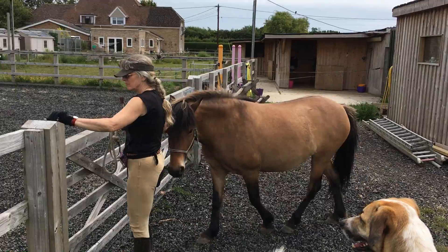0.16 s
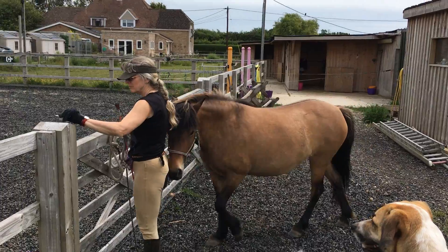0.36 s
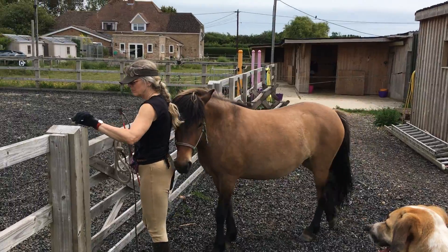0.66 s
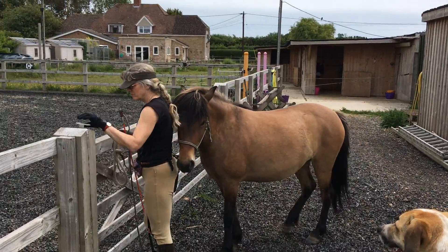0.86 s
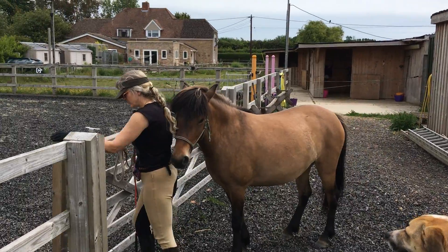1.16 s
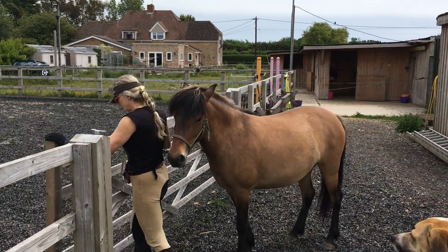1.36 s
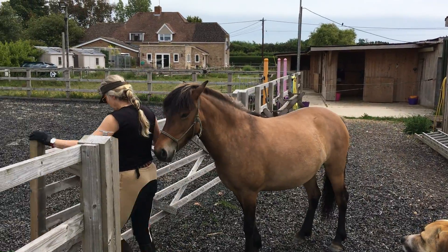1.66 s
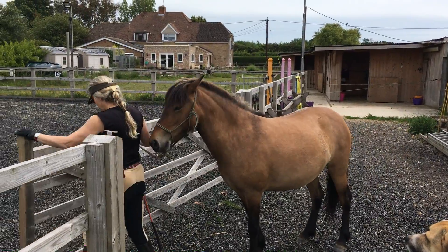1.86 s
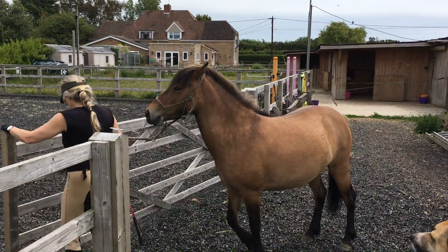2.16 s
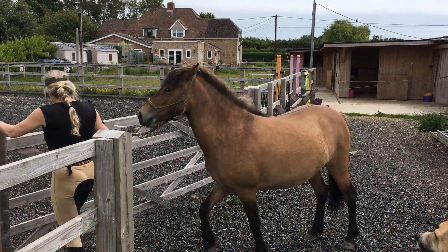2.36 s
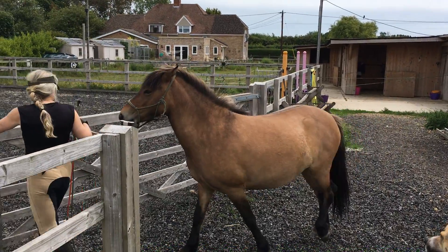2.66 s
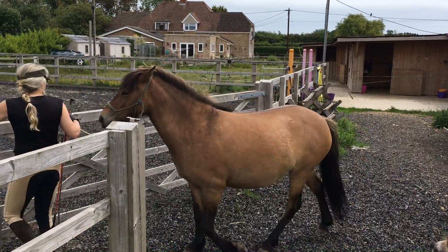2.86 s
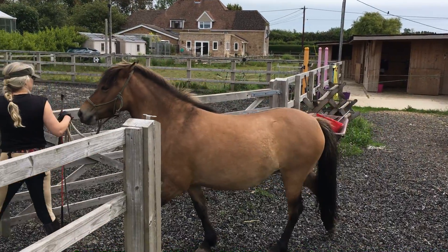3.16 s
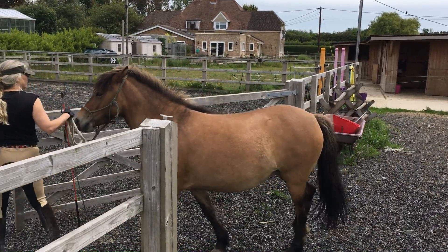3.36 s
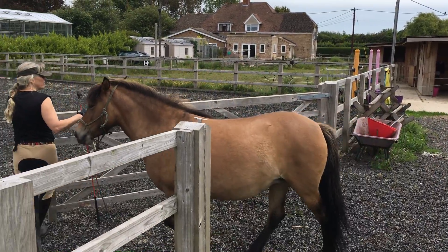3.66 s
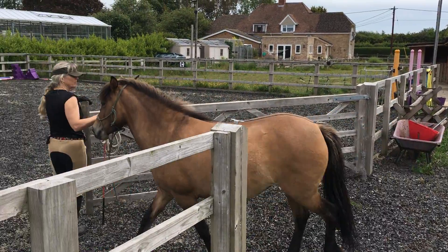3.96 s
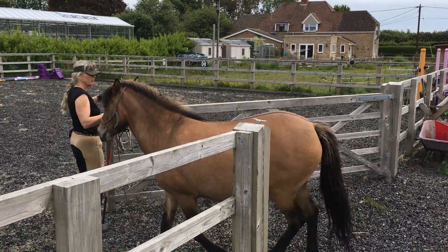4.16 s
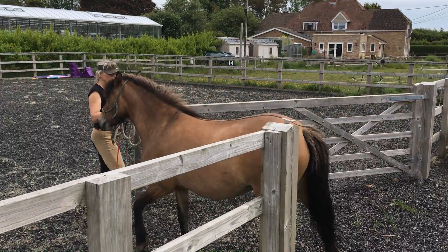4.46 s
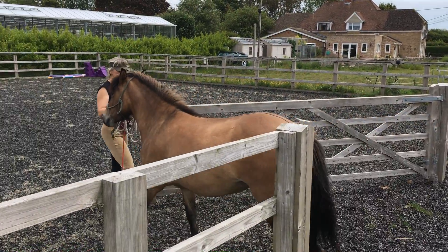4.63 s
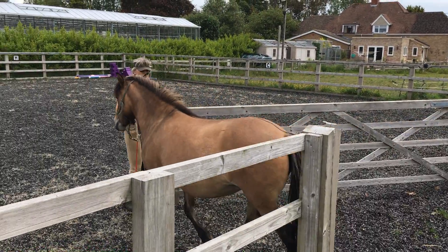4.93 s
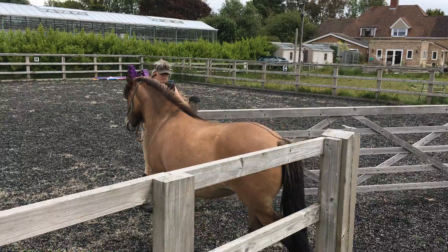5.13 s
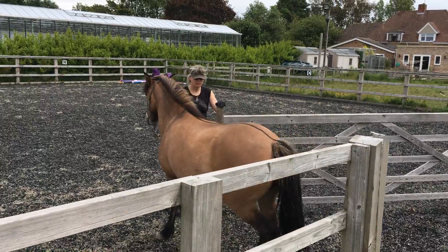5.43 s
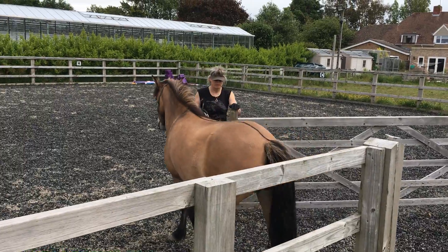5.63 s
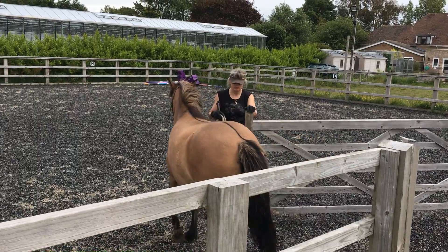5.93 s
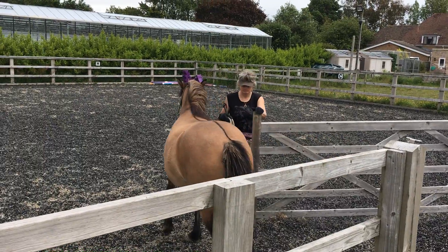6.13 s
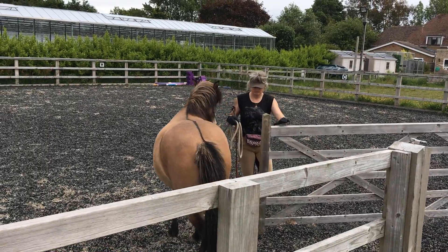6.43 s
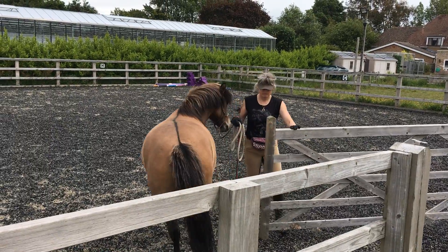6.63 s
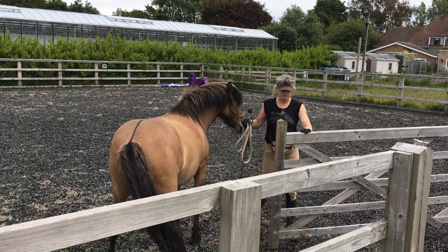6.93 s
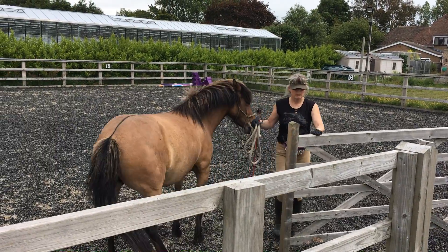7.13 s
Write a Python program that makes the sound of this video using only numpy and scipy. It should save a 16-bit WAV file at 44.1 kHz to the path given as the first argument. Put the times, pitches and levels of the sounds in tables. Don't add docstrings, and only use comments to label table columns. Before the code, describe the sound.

Outdoors, two sharp latch knocks ring out, slow hoof steps crunch stone chippings, and a distant horse's shrill whinny drops into a throaty snort.

```python
import sys
import numpy as np
from scipy import signal
from scipy.fft import rfft, irfft
from scipy.io import wavfile

SR = 44100
rng = np.random.default_rng(int(sys.argv[2]) if len(sys.argv) > 2 else 0)


def invert_db(level):
    return 10 ** (np.asarray(level, dtype=float) / 20)


def dump(signal):
    limited = np.clip(np.atleast_2d(signal).T, -1, 1)
    pcm = np.round(limited * 32767).astype(np.int16)
    wavfile.write(sys.argv[1], SR, pcm)


N = 321489

# (frequency [Hz], density [dB per Hz])
AIR_COLOUR = [(20, -44), (50, 5.5), (300, -13), (480, -30.5), (700, -20), (2200, -30.5), (13500, -37),
              (16000, -38)]
AIR_DB = -58
TRAFFIC_HZ, TRAFFIC_WIDTH_HZ, TRAFFIC_DB, TRAFFIC_SWELL_DB = 69.8, 11.5, -56.5, 1.2
CAPSULE_HZ, CAPSULE_WIDTH_HZ, CAPSULE_DB = 13800, 3000, -73.5

# (middle [s], half length [s], bright crunch [dB], dull crunch [dB])
STRIDES = [(0.0, 0.22, -67.5, -74.5), (0.317, 0.043, -54, -66), (0.422, 0.25, -83, -63),
           (0.585, 0.029, -73, -74), (0.622, 0.028, -63, -54), (0.75, 0.085, -62, -68.5),
           (1.095, 0.71, -73, -67.5), (1.503, 0.078, -65, -61.5), (1.77, 0.39, -64.5, -65.5),
           (2.212, 0.37, -68, -67.5), (2.634, 0.1, -67, -69), (2.767, 0.13, -63, -62),
           (2.898, 0.11, -64.5, -65), (3.07, 0.14, -64.5, -66), (3.242, 0.16, -67.5, -67),
           (3.58, 1, -69.5, -68.5), (3.819, 0.069, -69, -63), (4.037, 0.23, -66, -59.5),
           (5.483, 0.16, -72, -64), (6.273, 0.035, -67.5, -86), (6.453, 0.027, -64, -68.5),
           (6.666, 0.1, -70, -78), (6.988, 0.1, -65.5, -67.5), (7.28, 0.22, -59.5, -62.5)]
# (time [s], peak [dB], body [dB])
FLAKES = [(0.196, -51.5, -4), (0.7402, -38, -39), (0.7677, -43, -30), (1.3553, -50, -0.5),
          (1.4341, -33, -47), (2.5805, -43.5, -26), (3.04, -42, -8), (3.0624, -44, -35.5),
          (3.1882, -43, -28), (3.2894, -42.5, -19), (3.3024, -41, -14.5), (3.3278, -49.5, -5.5),
          (3.477, -46, -35), (3.6406, -47.5, -23), (3.7793, -50, -9), (3.8492, -40.5, -19),
          (7.1694, -47.5, -19)]
# (time [s], peak [dB], body [dB])
STONES = [(0.7814, -42, -27), (1.2885, -39.5, -49), (1.4745, -38.5, -18), (1.483, -44, -18),
          (1.4994, -46, -5.5), (1.5254, -42, -14), (2.745, -50, -8.5), (2.906, -49, -20),
          (3.8187, -44, -2.5), (3.93, -44.5, -9), (3.9589, -36.5, -17), (4.0312, -39.5, -20),
          (4.0534, -39, -23), (5.7654, -59, 4.5), (5.855, -51.5, -6.5), (5.9644, -51.5, -3),
          (6.094, -58, -4), (6.5924, -40.5, -12), (6.6618, -42, -9)]
# (time [s], peak [dB], pitch [Hz])
CHIPS = [(.736, -46, 9100), (.7415, -48, 6470), (.757, -42, 12000), (.765, -42.5, 4300), (.768, -42, 6500),
         (.77, -42, 14500), (0.7792, -43, 6440), (0.779, -45, 11500), (.811, -52, 12000), (.87, -52, 13000),
         (1.354, -58, 900), (1.151, -55, 6000), (1.166, -52, 12500), (1.2327, -57.5, 8800),
         (1.336, -62, 4860), (1.37, -55, 6300), (1.379, -53, 6300), (1.426, -49, 11000),
         (1.4258, -48.5, 3480), (1.5601, -50, 13000), (1.6364, -52, 12100), (1.665, -52, 5000),
         (1.7591, -64, 6100), (1.7675, -51, 5970), (1.927, -60, 6000), (2.01, -54, 14000),
         (2.3947, -54.5, 9700), (2.438, -58.5, 6160), (2.6115, -57, 13000), (2.6601, -54, 12350),
         (2.735, -49.5, 2120), (2.778, -54, 3000), (2.906, -51, 7000), (2.945, -56, 3490),
         (3.041, -52, 13400), (3.0605, -58, 8760), (3.061, -36.5, 11000), (3.151, -53, 4000),
         (3.288, -47, 14000), (3.304, -42, 14500), (3.33, -52, 12500), (3.425, -56.5, 13000),
         (3.439, -53.5, 4570), (3.478, -49, 11600), (3.3754, -54, 14100), (3.6095, -51, 9180),
         (3.694, -52.5, 3280), (3.9935, -51, 6060), (5.125, -41, 720), (5.768, -56, 1030),
         (5.857, -56.5, 1590), (6.094, -58, 2190), (6.6616, -51, 2410), (6.4284, -69.5, 5970)]
GRAINS_PER_S = 1000
GATE_STILL_S = 0.72
FLAKE_HZ, STONE_HZ = 13000, 3100
SNAP_RISE_S, SNAP_T60_S = 0.002, 0.045
CRACK_T60_S, CRACK_DB = 0.012, 3
CHIP_T60_S, CHIP_LEAD_S, CHIP_SPREAD = 0.012, 0.004, 1.35
CHIP_BITE_DB, CHIP_MIDDLE_HZ = 14, 10000

# (time [s], peak [dB], half length [s], lower modes [dB])
SQUEALS = [(0.35, -13, 0.011, -11), (0.361, -19, 0.0061, 1.5), (0.37, -13.5, 0.011, -14.5),
           (0.384, -25, 0.013, -10), (0.406, -39, .015, -13), (.424, -40, 0.0055, -19),
           (.448, -33, .008, -20.5), (0.465, -36.5, 0.015, -17), (0.482, -45, 0.017, -4),
           (0.528, -62, .02, 5), (0.554, -65, 0.061, 3)]
# (frequency [Hz], level [dB], width [Hz])
PIN = [(13290, 0, 48), (6800, -5, 91), (7770, -22, 180), (11300, -15, 150), (5900, -15.5, 200),
       (14100, -22.5, 370)]
# (time [s], peak [dB], timber [dB], t60 [s])
KNOCKS = [(0.2424, -22.5, -31, 0.058), (0.3503, -44, -40, 0.16), (0.366, -13, -39.5, 0.047),
          (0.387, -20, -28, 0.078), (0.3926, -2, -24.5, 0.025), (0.3967, -21, -27, 0.06),
          (0.4137, -33, -50, 0.2), (0.428, -33, -48, 0.069), (0.4536, -31, -49, 0.063),
          (0.495, -35, -52, 0.13), (0.5273, -46, -49.5, 0.08), (0.57, -70, -55.5, 0.42),
          (0.632, -46, -41, 0.06), (0.652, -43, -46, 0.02), (0.846, -84, -49.5, 0.086),
          (0.879, -40, -43, 0.091), (0.937, -64, -50, 0.12), (0.945, -15, -24, 0.079),
          (0.9544, -34.5, -59, 0.27), (0.964, -20, -30.5, 0.095), (0.9767, -23, -25, 0.045),
          (0.9806, -34, -40, 0.052), (0.997, -50, -53, 0.17), (1.047, -40, -60, 0.13),
          (1.073, -44.5, -59, 0.24)]
# (frequency [Hz], width [Hz], level [dB])
TIMBER = [(717, 95, -6), (1029, 270, -3.5), (1230, 244, -1.5), (1480, 290, -4.5), (2260, 390, -9),
          (3000, 1000, -13.5)]
# (frequency [Hz], level [dB])
BOLT = [(4100, -4.5), (5717, 3.5), (6702, -1.5), (8527, -3.5), (9388, -4), (10420, -7), (11230, 0),
        (11890, 1), (12690, -1), (13260, -2), (14100, -5), (15330, -6)]
# (middle [s], peak [dB], half length [s])
BOOMS = [
    (.2465, -40, 0.0082),
    (0.371, -36, .003),
    (0.3965, -16, 0.0061),
    (.406, -29, 0.0046),
    (.58, -54, .015),
    (0.653, -49, .006),
    (0.956, -39, 0.0029),
    (0.9783, -27.5, 0.0043),
]
# (frequency [Hz], level [dB])
POST = [(1017, -5), (1168, -3.5), (1599, -14.5)]
BOLT_FREE_S = 0.872
BOLT_WIDTH_HZ, BOLT_DB, SLIDE_DB = 125, 0, -55
BLOW_DB, BLOW_S = -2, 0.0004

# (start [s], length [s], from [Hz], to [Hz], level [dB])
BIRDS = [(2.19, .014, 4100, 3800, -67), (2.716, 0.035, 3420, 3340, -71), (5.547, .04, 6300, 4230, -72),
         (5.843, 0.14, 5900, 5880, -74), (2.404, 0.042, 1430, 1480, -66.5),
         (2.438, .026, 2560, 2170, -66.5), (2.457, 0.028, 2140, 1840, -62.5),
         (3.468, 0.051, 2745, 3080, -68.5), (3.502, 0.052, 3050, 3130, -72), (3.54, .04, 3120, 3060, -71),
         (3.545, 0.046, 3000, 2750, -72), (3.62, .024, 3080, 3100, -71), (5.519, 0.077, 3680, 4160, -60),
         (5.682, 0.052, 8300, 8100, -72), (5.738, 0.051, 8100, 7500, -79.5),
         (5.782, 0.061, 4450, 4350, -65.5), (6.012, 0.075, 5900, 4910, -76),
         (6.326, 0.085, 4470, 4460, -67), (6.422, 0.13, 4380, 4530, -74), (6.495, 0.016, 7350, 6300, -80),
         (6.496, 0.025, 6260, 6400, -68), (6.514, 0.079, 7040, 7310, -74), (6.588, 0.036, 6550, 6300, -72),
         (6.659, .07, 5600, 5650, -76), (6.741, 0.064, 5540, 5600, -71), (6.762, 0.024, 4940, 3420, -74.5),
         (6.779, 0.09, 3400, 3660, -71), (7.01, .045, 3700, 3950, -68), (7.1, 0.063, 4300, 4400, -75),
         (6.841, 0.063, 3620, 3900, -63)]
# (start [s], length [s], from [Hz], to [Hz], level [dB])
RASPS = [
    (6.86, 0.14, 3800, 3800, -67),
    (7.04, 0.085, 4700, 4250, -69.5),
]
RASP_WIDTH_HZ = 690
YARD_T60_S, YARD_DB = 0.5, -9

# (time [s], pitch [Hz], roughness [0-1])
FOLDS = [
    (3.98, 255, .3),
    (4.211, 300, .12),
    (4.421, 338, .64),
    (4.88, 285, .68),
    (5.0, 256, .6),
    (5.269, 213, .68),
    (5.33, 268, .55),
    (5.4, 172, .8),
    (6.3, 100, 1.14),
]
# (time [s], effort [dB], mouth brightness [dB], hiss [dB])
EFFORT = [
    (3.981, -62, -6, -17),
    (4.08, -61, -6, -35),
    (4.28, -54.5, -4, -6.5),
    (4.5, -45.5, 5.5, -9),
    (4.75, -46.5, 5.5, -5.5),
    (4.96, -42.5, -5, -15.5),
    (5.27, -40.5, -5, -23),
    (5.39, -45, -6.5, -15.5),
    (5.52, -54, 1.5, -9),
]
# (frequency [Hz], width [Hz], level [dB])
THROAT_LOW = [(1129, 156, 6), (1336, 500, 4), (1630, 175, 4), (1955, 330, 3), (2437, 89, 6)]
# (frequency [Hz], width [Hz], level [dB])
THROAT_HIGH = [(3262, 213, 8.5), (3676, 360, 5), (3470, 100, 6.5), (4250, 113, 5.5), (5230, 550, -10),
               (5750, 900, -19)]
# (frequency [Hz], density [dB per Hz])
HISS = [(4300, -47), (5200, 9.5), (6000, 0), (9000, 5.5), (10300, -6.5), (11300, 0), (16000, -4)]
# (frequency [Hz], width [Hz], level [dB])
SINUS = [(6300, 280, 8.5), (7440, 84, 13), (8350, 150, 8.5), (9540, 430, 13), (11000, 250, 11),
         (11500, 238.7, -5), (12900, 300, -3)]
# (time [s], peak [dB], half length [s], mouth brightness [dB])
HEAVES = [(5.127, -58, 0.097, -14), (5.332, -41.5, 0.046, -9.5), (5.672, -63.5, 0.16, -4),
          (5.818, -61, 0.023, 1), (5.84, -55, 0.013, -4), (5.86, -57, 0.014, 2), (5.88, -59, 0.03, 2),
          (5.904, -63, 0.014, 6.5), (5.931, -54, 0.041, 1.5), (5.967, -55, 0.0087, -9),
          (5.986, -62, 0.011, 0), (6.002, -61.5, 0.041, -1), (6.093, -76, 0.09, 9),
          (6.22, -79, 0.093, 10.5), (6.376, -81.5, .1, 10)]
# (frequency [Hz], width [Hz], from [s], to [s], depth [0-1])
NOSE = [(2560, 580, 4.79, 5.1, 1), (2770, 480, 6.7, 4.81, 0.37), (1113, 550, 4.88, 5.11, 0.81),
        (4390, 1840, 4.74, 5.2, 0.66)]
VOICE_END_S, RELEASE_DB_PER_S, HEAVE_HISS_DB = 6.89, 261, -48
THROAT_OPEN_S = 0.3
SECOND_LOW_HZ, SECOND_LIFT_HZ, SECOND_LIFT_S = 430, 90, 5.33
SINUS_SHUT_S, SINUS_SHUT_LENGTH_S, SINUS_LEFT, SINUS_SWAY = 4.5, 0.022, 0.4, 0.0091
NOSTRIL_HZ, NOSTRIL_WIDTH_HZ, NOSTRIL_DB, NOSTRIL_FROM_S = 3335, 260, -6, 5.76

# (time [s], middle pitch [Hz], level [dB])
WHISTLE = [
    (4.0, 1454, -62),
    (4.1, 1499, -41.5),
    (4.235, 1597, -39.5),
    (4.33, 1668, -41.5),
    (4.44, 1707, -31.5),
    (4.62, 1793, -33.5),
    (4.72, 1775, -36),
    (5.03, 1743, -36),
    (5.37, 1644, -45),
]
OVERTONES = [0, -24, -27, -23, -27, -33]
SIDEBANDS = [-22, -20.5]
# (time [s], step up [Hz], stumble [dB])
LEAPS = [
    (4.046, 125.5, -4),
    (4.065, -55, -1.5),
    (4.131, 24, 1),
    (4.238, 56, -3.5),
    (4.41, 77, -1),
    (4.468, -0.5, -14),
    (4.52, 24.5, 2),
    (4.6, -25.5, 0),
]
# (middle [s], half length [s], change [dB])
SURGES = [(4.222, 0.03, 4.5), (4.453, .015, -1), (4.494, 0.014, 7), (4.501, 0.02, 2.5), (4.529, 0.008, -15),
          (4.575, 0.014, 1), (4.588, .007, -15), (4.596, 0.023, 5.5), (4.677, 0.01, -1),
          (4.714, 0.015, 4.5), (4.773, 0.019, -3), (4.819, 0.032, -11), (4.858, .015, -1.5),
          (4.948, 0.012, 1), (4.973, .012, 0), (5.025, 0.0074, 8), (5.092, 0.016, -2), (5.133, 0.016, 8.5),
          (5.176, 0.012, -8)]
LEAP_S, STUMBLE_S = 0.00827, 0.045
TRILL_CREST_S, TRILL_PER_S, TRILL_HZ = 4.54, 10.15, 80
TRILL_START_S, TRILL_GROW_S, TRILL_END_S, TRILL_FADE_S = 4.47, 0.06, 5.22, 0.17
TRILL_WIDEN_S, TRILL_WIDEN_HZ = 4.65, 40
TRILL_STEP, TRILL_STEP_LATE, TRILL_EASE_S = 2.6, 1.2, 0.3
PUSH_DB, PUSH_LEAD, CREST_DB = 0.5, 0.16, 2
HOARSE_FROM_S, HOARSE_RISE_S, HOARSE_TOP = 4.3, 0.3, 0.42
OVERTONE_DB, SQUEAK_DB, SQUEAK_S = -9, 8, 0.12
OVERTONE_BREAK_DB, OVERTONE_SAG_FROM_S, OVERTONE_SAG_DB = 3.5, 4.66, -6

# (time [s], pitch [Hz])
CHEST = [
    (5.255, 241),
    (5.28, 206),
    (5.33, 277.4),
    (5.365, 210),
    (5.382, 166),
    (5.43, 168.7),
    (5.475, 146.6),
    (5.505, 160.3),
    (5.55, 141.5),
]
# (time [s], peak [dB], half length [s])
THROBS = [
    (5.284, -36.5, 0.019),
    (5.316, -41.5, 0.041),
    (5.365, -37, 0.037),
    (5.422, -32, 0.043),
    (5.461, -37, 0.019),
    (5.487, -36.5, 0.014),
    (5.507, -34.5, 0.011),
]
# (time [s], peak [dB], pitch [Hz], t60 [s])
GRUNTS = [
    (5.519, -42.5, 76.7, 0.21),
    (5.577, -42.5, 83, 0.11),
    (5.613, -36.5, 63.6, 0.15),
    (5.709, -40, 63.2, 0.11),
    (5.824, -46, 110.7, 0.28),
    (5.894, -25.5, 198, 0.014),
    (5.903, -39.5, 65.2, 0.25),
    (5.959, -40, 75.4, 0.18),
    (6.031, -44, 64.7, 0.15),
]
CHEST_SECOND_DB, GROWL_DB = -22.5, -12
HALF_FROM_S, HALF_PER_S = 5.33, 4
CHEST_JITTER, CHEST_SHAKE_DB = 0.15, 5
EDGE_HZ = 15900


def evened(x):
    return x / np.sqrt(np.mean(x ** 2) + 1e-20)


def add(mix, s, sound):
    part = mix[round(s * SR):][:len(sound)]
    part += sound[:len(part)]


def played(rows):
    s, *columns = np.transpose(rows)
    t = np.arange(s[0], s[-1], 1 / SR)
    return t, [np.interp(t, s, c) for c in columns]


def ramp(t, from_s, length_s):
    return np.clip((t - from_s) / length_s, 0, 1)


def arch(t, middle_s, half_s):
    return np.cos(np.pi / 2 * np.clip((t - middle_s) / half_s, -1, 1))


def swells(t, rows):
    coarse = t[::32]
    return np.interp(t, coarse, sum(invert_db(db) * arch(coarse, s, half) ** 2 for s, half, db in rows))


def wander(count, hz):
    r = np.exp(-2 * np.pi * hz / SR)
    return evened(signal.lfilter([1], [1, -2 * r, r * r], rng.standard_normal(count)))


def resonate(x, hz, width):
    turn = np.exp(2j * np.pi * np.cumsum(hz * np.ones(len(x))) / SR)
    r = np.exp(-np.pi * abs(width) / SR)
    return 2 * (turn * signal.lfilter([1 - r], [1, -r], x / turn)).real


def coloured(x, points):
    f, db = np.transpose(points)
    hz = np.fft.rfftfreq(len(x), 1 / SR)
    gain = invert_db(np.interp(np.log(hz + 1), np.log(f + 1), db))
    return evened(irfft(rfft(x) * gain, len(x)))


def band(x, lo_hz, hi_hz):
    edges = [lo_hz, min(hi_hz, 0.45 * SR)]
    return signal.sosfilt(signal.butter(2, edges, "bandpass", fs=SR, output="sos"), x)


def air():
    drone = evened(resonate(rng.standard_normal(N), TRAFFIC_HZ, TRAFFIC_WIDTH_HZ))
    drone_level = invert_db(TRAFFIC_DB + TRAFFIC_SWELL_DB * wander(N, hz=0.17))
    capsule = evened(resonate(rng.standard_normal(N), CAPSULE_HZ, CAPSULE_WIDTH_HZ))
    hush = coloured(rng.standard_normal(N), AIR_COLOUR)
    return invert_db(CAPSULE_DB) * capsule + invert_db(AIR_DB) * hush + drone_level * drone


def snapping_stones():
    out, t = np.zeros(N), np.arange(SR // 10) / SR
    for rows, hz in (FLAKES, FLAKE_HZ), (STONES, STONE_HZ):
        for s, db, body_db in rows:
            grit = rng.standard_normal(len(t)) * ramp(t, 0, SNAP_RISE_S)
            rattle = invert_db(db - 60 * t / SNAP_T60_S) * grit
            crack = rattle + invert_db(db + CRACK_DB - 60 * t / CRACK_T60_S) * grit
            body = invert_db(body_db + 12) * band(rattle, 450, 1500)
            add(out, s, invert_db(-9) * band(crack, hz / 2.5, hz * 2.5) + body)
    for s, db, hz in CHIPS:
        bite = invert_db(db - 60 * abs(t - CHIP_LEAD_S) / CHIP_T60_S) * rng.standard_normal(len(t))
        bite[round(CHIP_LEAD_S * SR)] += invert_db(db + CHIP_BITE_DB) * CHIP_MIDDLE_HZ / hz
        add(out, s + 0.00098 - CHIP_LEAD_S, band(bite, hz / CHIP_SPREAD, hz * CHIP_SPREAD))
    return out


def shuffle():
    t = np.arange(N) / SR
    sizes = invert_db(5.5 * np.minimum(rng.exponential(1, N), 3.2))
    sizes *= rng.random(N) < GRAINS_PER_S / SR
    grains = signal.lfilter([1], [1, -0.97], sizes) * rng.standard_normal(N)
    grit = evened(grains) + 0.96 * rng.standard_normal(N)
    bright = evened(band(grit, 4900, 18000))
    gate_drag = (t < GATE_STILL_S) * evened(band(grit, 484, 1600))
    dull = evened(band(grit, 810, 3670)) + gate_drag
    bright_level = swells(t, [(s, half, db) for s, half, db, _ in STRIDES])
    dull_level = swells(t, [(s, half, db) for s, half, _, db in STRIDES])
    return bright_level * bright + dull_level * dull


def latch_squeal(t):
    main, lower = np.zeros((2, len(t)))
    for s, db, half, lower_db in SQUEALS:
        swell = invert_db(db) * np.hanning(int(2 * half * SR) + 3)
        add(main, s - half, swell)
        add(lower, s - half, invert_db(lower_db) * swell)
    main_hz, _, main_width = PIN[0]
    squeal = main * np.sin(2 * np.pi * main_hz * t + 0.5 * wander(len(t), hz=main_width))
    slips = rng.standard_normal(len(t))
    return squeal + lower * sum(invert_db(db) * evened(resonate(slips, f, w)) for f, db, w in PIN[1:]) / 2


def latch_knocks(t):
    tick, wood = np.zeros((2, len(t)))
    short = t[:SR // 6]
    blow = invert_db(BLOW_DB) * np.sin(np.pi * ramp(short, 0, BLOW_S))
    for s, db, wood_db, t60 in KNOCKS:
        rattle = rng.standard_normal(len(short))
        rattle *= invert_db(-60 * short / t60) * (1 - np.exp(-short / 0.001))
        add(tick, s, invert_db(db) * rattle)
        add(wood, s, invert_db(wood_db) * (rattle + blow))
    metal = tick * (t > BOLT_FREE_S)
    add(metal, BOLT_FREE_S + 0.012, invert_db(SLIDE_DB) * rng.standard_normal(SR // 16))
    out = invert_db(BOLT_DB) * sum(invert_db(db) * resonate(metal, f, BOLT_WIDTH_HZ) for f, db in BOLT)
    out += invert_db(15) * sum(invert_db(db) * resonate(resonate(wood, f, w), f, 2 * w) for f, w, db in TIMBER)
    boom = np.sqrt(sum((invert_db(db) * arch(t, s, half)) ** 2 for s, db, half in BOOMS))
    out += boom * sum(invert_db(db) * np.sin(2 * np.pi * f * t) for f, db in POST)
    return out + invert_db(-14.5) * band(tick, 870, 9900)


def latch():
    t = np.arange(3 * SR // 2) / SR
    out = np.zeros(N)
    add(out, 0, latch_squeal(t) + latch_knocks(t))
    return out


def birds():
    out = np.zeros(N)
    for s, length, from_hz, to_hz, db in BIRDS:
        hz = np.linspace(from_hz, to_hz, int(length * SR))
        sway = wander(SR // 5, hz=61)[:len(hz)]
        flutter = wander(SR // 5, hz=30)[:len(hz)]
        tone = np.sin(2 * np.pi * np.cumsum(hz * (1 + 0.0053 * sway)) / SR)
        add(out, s, invert_db(db + 2 * flutter) * tone * signal.windows.tukey(len(hz), 0.5))
    for s, length, from_hz, to_hz, db in RASPS:
        hz = np.linspace(from_hz, to_hz, int(length * SR))
        rasp = rng.standard_normal(len(hz))
        tone = resonate(resonate(rasp, hz, RASP_WIDTH_HZ), hz, RASP_WIDTH_HZ)
        add(out, s, invert_db(db) * evened(tone) * np.hanning(len(hz)))
    return out


def yard(x):
    taps = np.zeros(SR // 2)
    at = np.arange(900, len(taps) - 40, 40)
    taps[at + rng.integers(0, 40, len(at))] = rng.choice([-1., 1.], len(at))
    taps *= invert_db(-60 * np.arange(len(taps)) / SR / YARD_T60_S)
    return invert_db(YARD_DB) * signal.fftconvolve(band(x, 700, 8700), taps / np.linalg.norm(taps))[:N]


def fold_cycles(t):
    s, hz, rough = np.transpose(FOLDS)
    hz = np.interp(t, s, hz)
    rough = np.clip(np.interp(t, s, rough), 0, 1)
    jitter = 1 + 0.0621 * rough * wander(len(t), hz=71.2)
    return hz, rough, np.cumsum(hz * jitter) / SR


def breath_hiss(t, puffs):
    hiss = coloured(puffs, HISS)
    ajar = 1 - (1 - SINUS_LEFT) * ramp(t, SINUS_SHUT_S, SINUS_SHUT_LENGTH_S)
    cavities = 0
    for f, w, db in SINUS:
        swaying_hz = f * (1 + SINUS_SWAY * wander(len(t), hz=4.8))
        cavities = cavities + invert_db(db) * resonate(hiss, swaying_hz, w)
    return evened(hiss + ajar * cavities)


def folds():
    s, *controls = np.transpose(EFFORT)
    t = np.arange(s[0], VOICE_END_S, 1 / SR)
    effort_db, bright_db, hiss_db = (np.interp(t, s, c) for c in controls)
    call = invert_db(effort_db - RELEASE_DB_PER_S * np.maximum(t - s[-1], 0))
    heave = swells(t, [(m, half, db) for m, db, half, _ in HEAVES])
    heave_bright = swells(t, [(m, half, db + mouth_db) for m, db, half, mouth_db in HEAVES])

    hz, rough, turns = fold_cycles(t)
    pulses = sum(np.cos(2 * np.pi * k * turns) for k in range(2, 24))
    puffs = evened((0.35 + np.exp(-(turns % 1) / 0.3)) * rng.standard_normal(len(t)))
    drive = (1 - rough) * evened(pulses) + rough * puffs
    drive /= np.hypot(1 - rough, rough)

    shake = 1 + 0.02 * wander(len(t), hz=9)

    def throat(modes):
        return evened(sum(invert_db(db) * resonate(resonate(drive, f * shake, w), f * shake, w) for f, w, db in modes))

    low, high = throat(THROAT_LOW), throat(THROAT_HIGH)
    rest_hz = np.maximum(2 * hz, SECOND_LOW_HZ + SECOND_LIFT_HZ * ramp(t, SECOND_LIFT_S, 0.022))
    second = evened(resonate(resonate(drive + 2 * rough * puffs, rest_hz, 330), rest_hz, 413))
    partials = ((1, 0), (2, -12), (3, -10))  # (number, dB)
    first = (1 - rough) ** 2 * sum(invert_db(db) * np.cos(2 * np.pi * k * turns) for k, db in partials)
    hiss = breath_hiss(t, puffs)
    nostril = resonate(resonate(drive, NOSTRIL_HZ, NOSTRIL_WIDTH_HZ), NOSTRIL_HZ, NOSTRIL_WIDTH_HZ)
    snort = invert_db(-2.5) * high + invert_db(NOSTRIL_DB) * evened(nostril)
    high = np.where(t > NOSTRIL_FROM_S, snort, high)

    dark = invert_db(3) * ramp(t, t[0], THROAT_OPEN_S) * low
    dark += invert_db(-3.5) * rough * np.sqrt(1 - rough ** 8) * second + invert_db(-1) * first
    voice = (call + heave) * dark
    voice += (call * invert_db(bright_db) + heave_bright) * high
    voice += (call * invert_db(hiss_db) + heave * invert_db(HEAVE_HISS_DB)) * hiss
    return t[0], invert_db(3.5 * rough ** 8 * np.tanh(wander(len(t), hz=60))) * voice


def whistle():
    t, (hz, db) = played(WHISTLE)
    hz = hz + sum(step * ramp(t, s, LEAP_S) for s, step, _ in LEAPS)
    db = db + sum(dip * (t > s) * (1 - ramp(t, s, STUMBLE_S)) for s, _, dip in LEAPS)

    depth = ramp(t, TRILL_START_S, TRILL_GROW_S) * ramp(-t, -TRILL_END_S, TRILL_FADE_S)
    swing = (TRILL_HZ + TRILL_WIDEN_HZ * ramp(t, TRILL_WIDEN_S, TRILL_GROW_S)) * depth
    beat = (t - TRILL_CREST_S) * TRILL_PER_S
    steepness = TRILL_STEP + (TRILL_STEP_LATE - TRILL_STEP) * ramp(t, TRILL_CREST_S, TRILL_EASE_S)
    trill = np.tanh(steepness * np.cos(2 * np.pi * beat) - 0.3)
    db = db + PUSH_DB * depth * np.cos(2 * np.pi * (beat + PUSH_LEAD))
    db = db + CREST_DB * depth * np.maximum(trill, 0)
    db = db + sum(change_db * arch(t, s, half) ** 2 for s, half, change_db in SURGES)

    hoarse = HOARSE_TOP * ramp(t, HOARSE_FROM_S, HOARSE_RISE_S)
    turns = np.cumsum(hz + swing * trill + 45 * hoarse * wander(len(t), hz=90)) / SR
    pure = np.cos(2 * np.pi * turns)
    overtones = 0
    for k, overtone_db in enumerate(OVERTONES):
        breaks_db = OVERTONE_BREAK_DB * min(k, 1) * wander(len(t), hz=14)
        level = invert_db(overtone_db - 36 * k * hoarse + breaks_db)
        overtones = overtones + level * np.cos(2 * np.pi * (k + 2) * turns)
    squeak_db = SQUEAK_DB * (1 - ramp(t, t[0], SQUEAK_S))
    fade_db = -0.045 * swing * (0.5 + trill)
    sag_db = OVERTONE_SAG_DB * ramp(t, OVERTONE_SAG_FROM_S, SQUEAK_S)
    tone = pure + overtones * invert_db(OVERTONE_DB + squeak_db + fade_db + sag_db)

    cycles = fold_cycles(t)[2]
    tone *= 1 + 2 * sum(invert_db(b) * np.cos(2 * np.pi * (k + 1) * cycles) for k, b in enumerate(SIDEBANDS))
    flutter_db = -18 * hoarse * np.maximum(wander(len(t), hz=130), 0) + 3.5 * hoarse
    return t[0], np.sqrt(2) * invert_db(db + flutter_db) * tone * signal.windows.tukey(len(t), 0.03)


def nose(call):
    t = np.arange(N) / SR
    for hz, width, from_s, to_s, depth in NOSE:
        call = call - np.interp(t, [from_s, to_s], [0, min(depth, 1)]) * resonate(call, hz, width)
    return call


def chest():
    out = np.zeros(N)
    t, (hz,) = played(CHEST)
    half = np.clip(HALF_PER_S * (t - HALF_FROM_S), 0, 0.55)
    turn = 2 * np.pi * np.cumsum(hz * (1 + CHEST_JITTER * half * wander(len(t), hz=60))) / SR
    level = swells(t, [(s, length, db) for s, db, length in THROBS])
    level = level * invert_db(CHEST_SHAKE_DB * half * wander(len(t), hz=50.3))
    note = np.sin(turn) + invert_db(CHEST_SECOND_DB) * np.sin(2 * turn) + half * np.sin(turn / 2 + 2)
    add(out, t[0], np.sqrt(2) * level * note)
    t = np.arange(SR // 3) / SR
    for s, db, hz, t60 in GRUNTS:
        growl = evened(band(rng.standard_normal(len(t)), 115, 187))
        push = np.sin(2 * np.pi * hz * t) + invert_db(GROWL_DB) * growl
        add(out, s, 2 * invert_db(db - 60 * t / t60) * push * (1 - np.exp(-t / 0.0026)))
    return out


def scene():
    song = birds()
    call = np.zeros(N)
    add(call, *folds())
    add(call, *whistle())
    call = nose(call)
    mix = air() + snapping_stones() + shuffle() + latch()
    mix += song + invert_db(3) * yard(song)
    mix += call + chest() + yard(call)
    return mix[None]


def low_pass(x):
    return signal.sosfilt(signal.butter(12, 16870, fs=SR, output="sos"), x)


def record(dry):
    edge = signal.firwin(511, EDGE_HZ, window=("kaiser", 9), fs=SR)
    mix = signal.oaconvolve(dry, edge[None], "same")
    return low_pass(mix)


dry = scene()
out = record(dry)
dump(out)
```